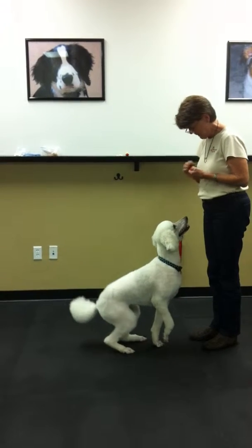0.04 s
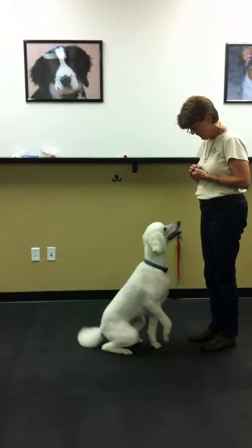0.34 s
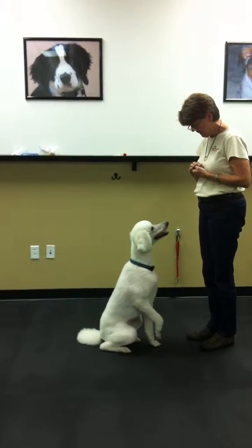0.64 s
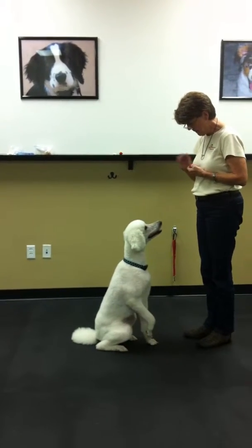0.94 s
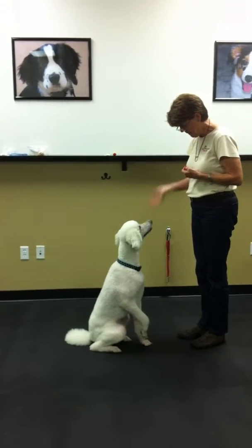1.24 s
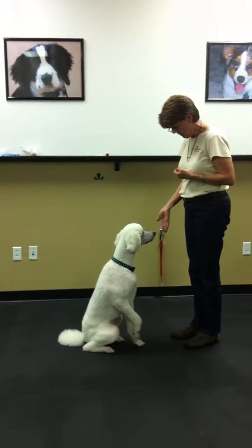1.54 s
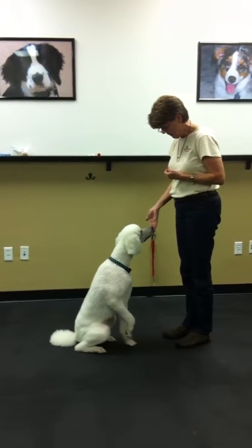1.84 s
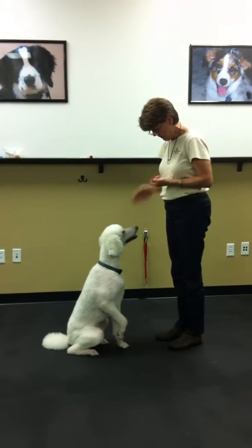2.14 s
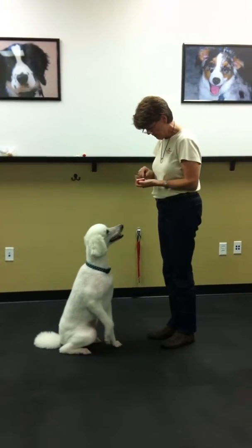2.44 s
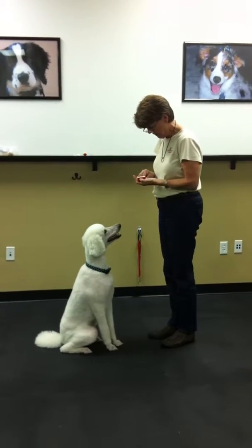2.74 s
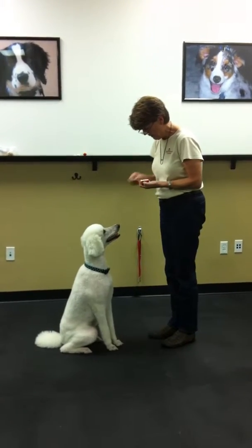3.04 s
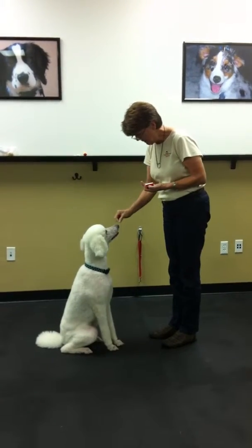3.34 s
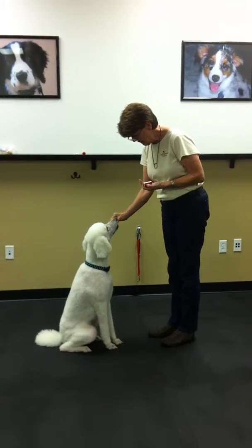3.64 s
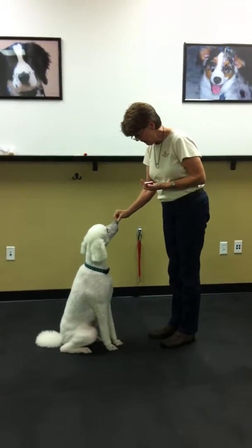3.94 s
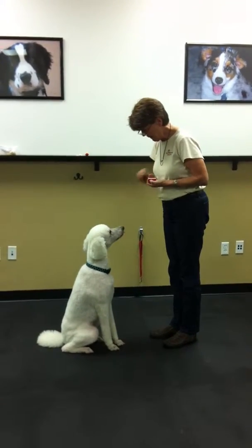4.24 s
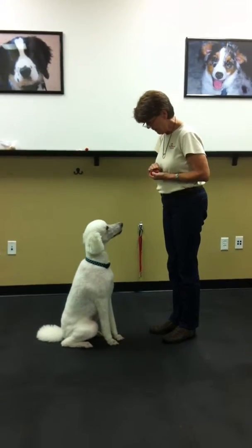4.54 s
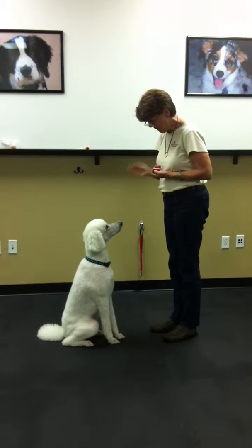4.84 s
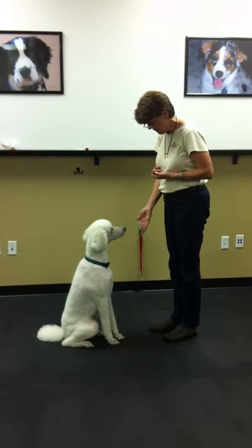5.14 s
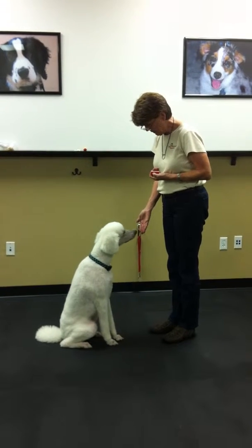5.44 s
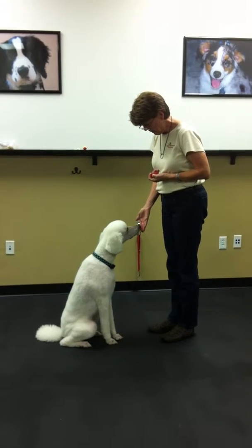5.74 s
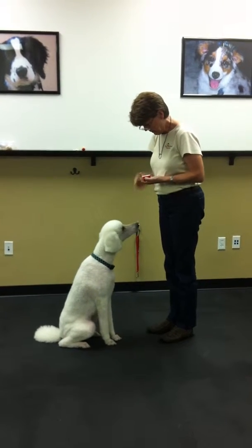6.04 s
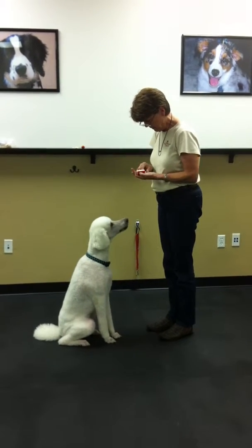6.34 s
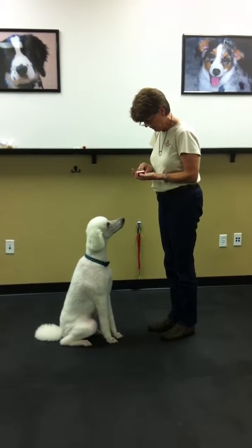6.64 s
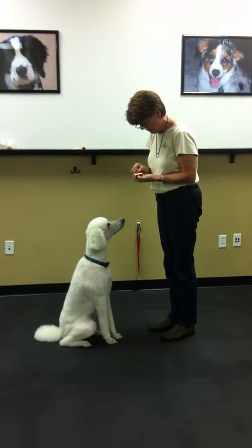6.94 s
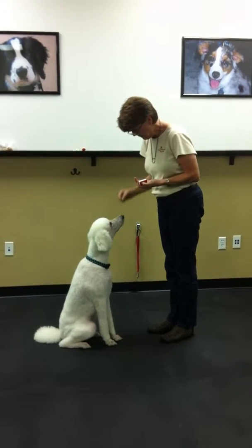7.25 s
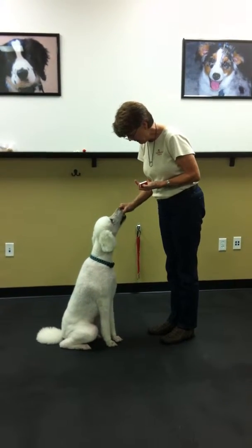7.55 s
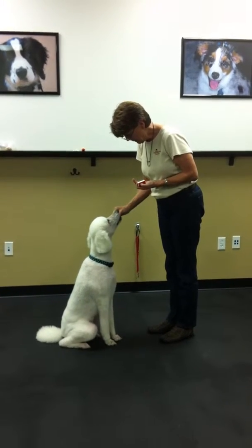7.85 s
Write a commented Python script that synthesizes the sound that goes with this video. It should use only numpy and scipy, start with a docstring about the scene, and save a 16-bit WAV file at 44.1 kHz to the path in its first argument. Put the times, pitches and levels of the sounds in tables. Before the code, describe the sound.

In a quiet room with a faint ventilation hum and thin hiss, a handheld clicker gives a sharp double click, bright on the press and lower on the release. After a pause of a few seconds it gives a second double click. The clicker is a few metres from the microphone, and every snap leaves a short echo that dulls as it fades.

```python
"""A bare room with a rubber floor: a few metres away, a dog trainer works a handheld clicker twice.
Each press buckles the steel tongue with a bright snap; on release it springs back with a lower one.
The walls answer every snap with quick echoes and a tail that darkens as it fades.
Underneath lies a faint, steady bed of duct rumble, blower and mains hum, and microphone hiss."""
import sys
import numpy as np
from scipy import signal
from scipy.fft import rfft, irfft
from scipy.io import wavfile

SR = 44100
rng = np.random.default_rng(int(sys.argv[2]) if len(sys.argv) > 2 else 0)


def master_out(mix):
    """Clip the mix to full scale and print it as 16-bit PCM to the path in sys.argv[1]."""
    frames = np.transpose(np.atleast_2d(mix))
    ceiling = np.clip(frames, -1, 1)
    pcm = np.round(ceiling * 32767).astype(np.int16)
    wavfile.write(sys.argv[1], SR, pcm)


N = 348831

# tongue pressed down: t/s, level/dB, main mode f/Hz, its boost/dB, treble/dB, hand hollow f/Hz, boost/dB
PRESS_CUES = [(1.9882, 8.5, 4073, 4.5, -6.5, 1780, 5.5), (5.7992, 13, 4010, 1.5, -18, 2400, 4.5)]
# tongue let go: same columns
RELEASE_CUES = [(2.1511, 8.46, 2440, -1, -22, 4620, 6.1), (5.9585, 9.2, 2400, 4.5, -13, 2320, 2.6)]
# ring of the buckled tongue in its plastic case: f/Hz, width/Hz, level/dB
BUCKLED_MODES = [(1980, 330, -19.5), (2440, 370, -23), (2965, 96, -8.5), (3820, 160, -3.5), (4074, 75, 3),
                 (4630, 260, -14.5), (5220, 600, -13), (6300, 500, -15), (6800, 390, -18),
                 (7280, 160, -13.5), (8920, 470, -16), (10800, 610, -13.5), (12300, 670, -14),
                 (14350, 1100, -17)]
# ring of the tongue back at rest: f/Hz, width/Hz, level/dB
RELAXED_MODES = [(1730, 130, -22), (1970, 160, -10.5), (2200, 180, -3.5), (2400, 81, -0.5),
                 (3460, 320, -14), (3900, 640, -11), (5070, 290, -42), (6800, 900, -28), (7600, 390, -20),
                 (8950, 660, -16), (9500, 300, -18), (10900, 450, -16.5), (12400, 840, -19),
                 (14240, 1200, -12.5)]
# round trips of bending waves in tongue and case: t/s
BENDING_TRIPS = [.00014, .00029, 0.00056]
# early reflections off floor, walls and ceiling: delay/s, level/dB, low-pass f/Hz
REFLECTIONS = [(.0036, 0, 15000), (.0048, -10.5, 9000), (.0100, -3, 4000), (0.0187, -9, 18110),
               (0.0366, -9, 5000), (.0525, -8, 3500), (.072, -16.5, 5000)]
# decay of the reverb tail: f/Hz, T60/s
TAIL_DECAY = [(1000, 1.2), (2400, 0.87), (4000, 0.85), (7000, 0.7), (11000, 0.39), (15000, 0.36)]
# colour of the tail against the direct snap: f/Hz, level/dB
TAIL_COLOUR = [(1000, 0.7), (2400, -0.067), (4000, -1.2), (7000, 1.1), (11000, 0.062), (15000, -2)]
# colour of the air in the ducts: f/Hz, relative level/dB
DUCT_COLOUR = [(25, -33.5), (55, -34), (80, -24.5), (103, -20.5), (120, -11.5), (160, -8.5), (180, -7.5),
               (260, -8.5), (292, -16.5), (350, -19.5), (460, -25.5), (1000, -29.5), (2000, -36.5),
               (3500, -39)]
# resonances of the ducts that lift the rumble: f/Hz, width/Hz, boost/dB
DUCT_MODES = [(163, 5.6, 4.5), (259.4, 10.5, 2.5), (332.4, 11.7, 3.5), (397, 11, 3.5)]
# tones of the blower and the mains: f/Hz, level/dB
BLOWER_AND_MAINS = [(138.9, -59.5), (258.8, -71.5), (184.6, -72), (121.7, -76.5)]
# colour of the microphone hiss: f/Hz, relative level/dB
HISS_COLOUR = [(3500, -1.5), (6000, -2), (10500, -5), (13500, -3), (16000, -1)]


def snaps(cues, modes, radiate_hz=1420, treble_hz=5500, hollow_width_hz=450, size=4096):
    """The tongue flips and rings; the grip sets the pitch and level of its strongest mode."""
    out = np.zeros(N)
    flip = disperse(signal.unit_impulse(size) + 1e-18)
    main = np.argmax(np.array(modes)[:, 2])
    for onset_s, level_db, main_hz, main_db, treble_db, hollow_hz, hollow_db in cues:
        ring = np.zeros(size)
        for k, (hz, width, db) in enumerate(modes):
            if k == main:
                hz, db = main_hz, db + main_db
            ring += from_db(db) * resonate(flip, hz, width)
        # the fingers shade the treble and the hollow of the hand adds its own colour
        ring += (from_db(treble_db) - 1) * (ring - cut(ring, treble_hz, "low", order=1))
        ring += (from_db(hollow_db) - 1) * resonate(ring, hollow_hz, hollow_width_hz)
        start = round(onset_s * SR)
        # a case this small radiates almost no bass
        out[start:start + size] += from_db(level_db) * cut(ring, radiate_hz, "high", order=4)
    return out


def disperse(kick, feedback=0.74):
    """Bending waves run to and fro and leak out bit by bit: the attack smears but keeps its colour."""
    for trip_s in BENDING_TRIPS:
        loop = np.r_[1, np.zeros(round(trip_s * SR) - 1), feedback]
        kick = signal.lfilter(loop[::-1], loop, kick)  # all-pass
    return kick


def room(source, build_s=0.0014, scatter_db=-6, scatter_s=0.015):
    """Direct sound, early reflections, scatter off nearby bodies and a tail whose top end dies first."""
    t, hz = np.arange(SR) / SR, np.fft.rfftfreq(SR, 1 / SR)
    response = signal.unit_impulse(SR)
    for delay_s, db, dull_hz in REFLECTIONS:
        slap = signal.unit_impulse(SR, round(delay_s * SR)) + 1e-18
        response += from_db(db) * cut(slap, dull_hz, "low")
    scatter = rng.standard_normal(SR) * np.exp(-t / scatter_s)
    response += from_db(scatter_db) * scatter / np.linalg.norm(scatter)
    white = rfft(rng.standard_normal(SR))
    edges_hz = np.geomspace(400, 18000, 18)
    for low, high in zip(edges_hz, edges_hz[1:]):
        centre = np.sqrt(low * high)
        decay = np.exp(-np.log(1000) * t / at_hz(TAIL_DECAY, centre))
        envelope = decay * (1 - np.exp(-t / build_s))
        band = irfft(white * ((hz >= low) & (hz < high)), SR)
        response += from_db(at_hz(TAIL_COLOUR, centre)) * band * envelope / np.linalg.norm(envelope)
    return signal.fftconvolve(source, response)[:N]


def duct_rumble(level_db=-58.5, top_hz=3500):
    """Air rumbles in the ducts, lifted by the resonances of the ducts themselves."""
    air = cut(coloured_noise(DUCT_COLOUR), top_hz, "low")
    boom = sum((from_db(db) - 1) * resonate(air, hz, width) for hz, width, db in DUCT_MODES)
    return from_db(level_db) * unit_rms(air + boom)


def hum(waver_hz=0.94, waver_per_s=5, throb_db=2, throb_per_s=6):
    """Blower and mains tones; turbulence makes each one waver in pitch and level."""
    out = np.zeros(N)
    for hz, db in BLOWER_AND_MAINS:
        phase = 2 * np.pi * np.cumsum(hz + waver_hz * drift(waver_per_s)) / SR
        throb = from_db(throb_db * drift(throb_per_s))
        out += from_db(db) * unit_rms(np.sin(phase) * throb)
    return out


def hiss(level_db=-71.5, low_hz=3500):
    """The thin, even hiss of the microphone."""
    return from_db(level_db) * unit_rms(cut(coloured_noise(HISS_COLOUR), low_hz, "high"))


def resonate(x, hz, width):
    """One resonance with gain 1 at its peak."""
    radius = np.exp(-np.pi * width / SR)
    poles = [1, -2 * radius * np.cos(2 * np.pi * hz / SR), radius ** 2]
    return signal.lfilter(np.array([1, 0, -1]) * (1 - radius ** 2) / 2, poles, x)


def cut(x, hz, kind, order=2):
    """Butterworth low- or high-pass."""
    return signal.sosfilt(signal.butter(order, hz, kind, fs=SR, output="sos"), x)


def coloured_noise(colour):
    """Steady noise shaped by an EQ curve."""
    gain = from_db(at_hz(colour, np.fft.rfftfreq(N, 1 / SR)))
    return irfft(rfft(rng.standard_normal(N)) * gain, N)


def drift(per_s):
    """Smooth random modulation at unit RMS."""
    points = rng.standard_normal(int(2 * per_s * N / SR) + 2)
    return unit_rms(signal.resample(points, N))


def at_hz(curve, hz):
    """Read a curve on a log-frequency axis."""
    f, value = np.transpose(curve)
    return np.interp(np.log(np.maximum(hz, 1)), np.log(f), value)


def from_db(db):
    """Decibels to gain."""
    return 10 ** (np.asarray(db) / 20)


def unit_rms(x):
    """Normalise to an RMS of 1."""
    return x / np.sqrt(np.mean(x ** 2) + 1e-20)


def scene():
    """Mono mix: the clicker in the room over the background bed."""
    clicker = snaps(PRESS_CUES, BUCKLED_MODES) + snaps(RELEASE_CUES, RELAXED_MODES)
    return (room(clicker) + duct_rumble() + hum() + hiss())[None]


def record(dry, cutoff_hz=15850):
    """A steep low-pass takes the very top off the mix."""
    return signal.sosfilt(signal.ellip(12, .1, 80, cutoff_hz, fs=SR, output="sos"), dry)


dry = scene()
out = record(dry)
master_out(out)
```